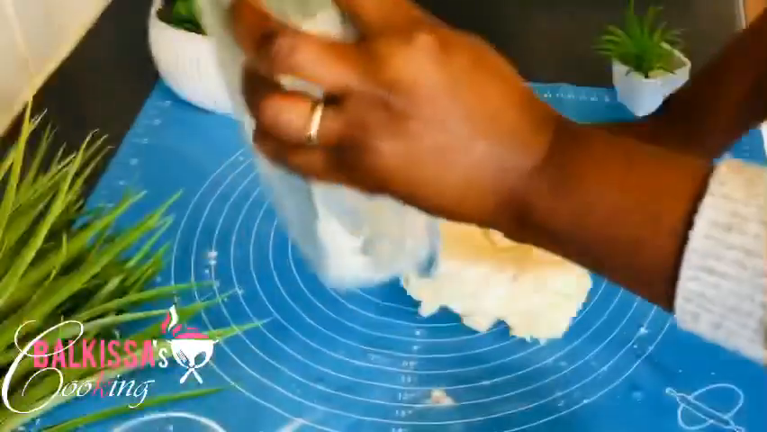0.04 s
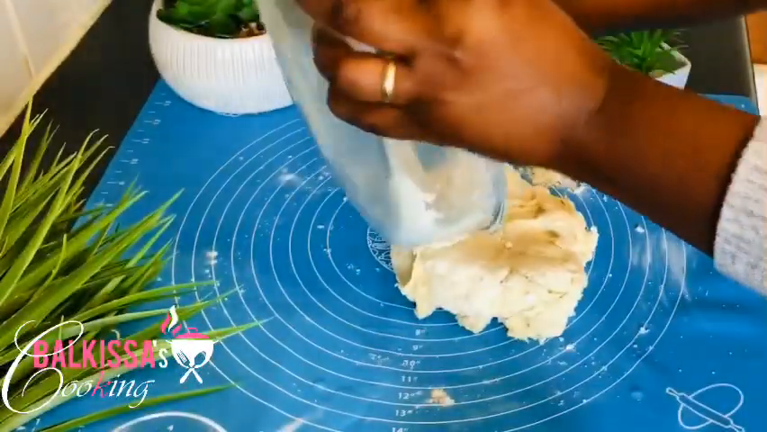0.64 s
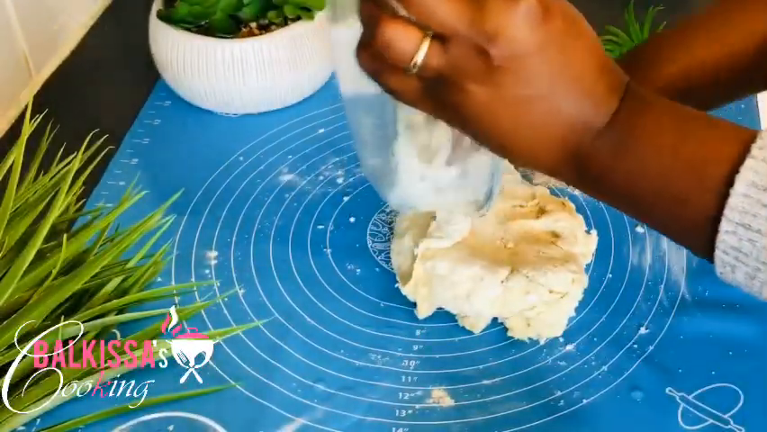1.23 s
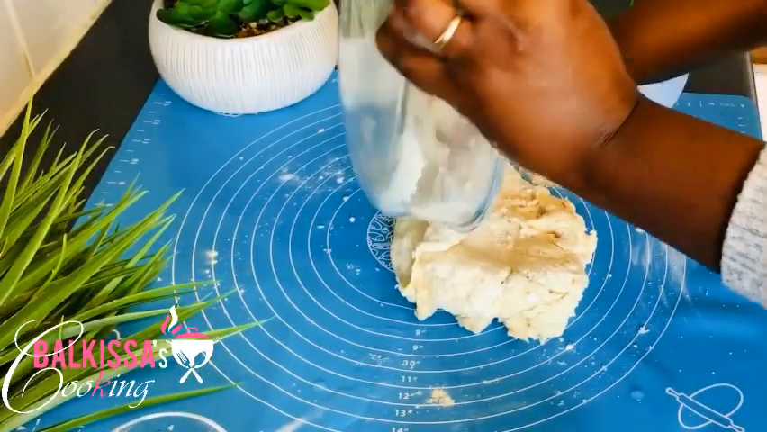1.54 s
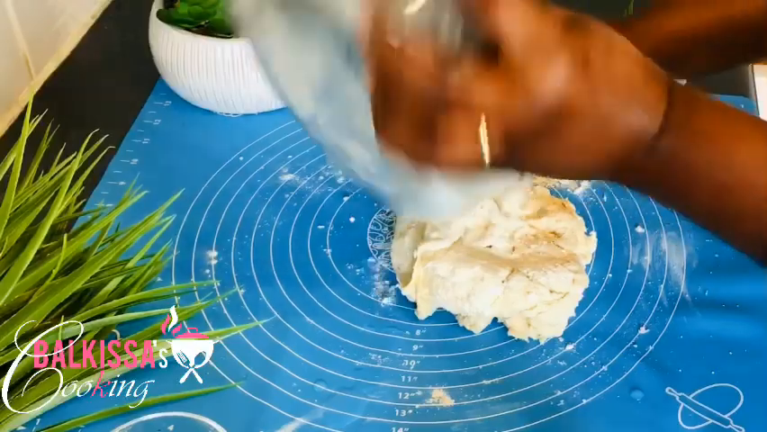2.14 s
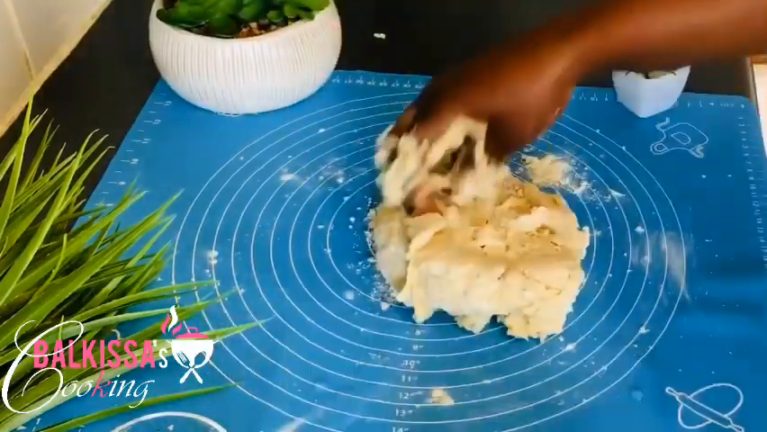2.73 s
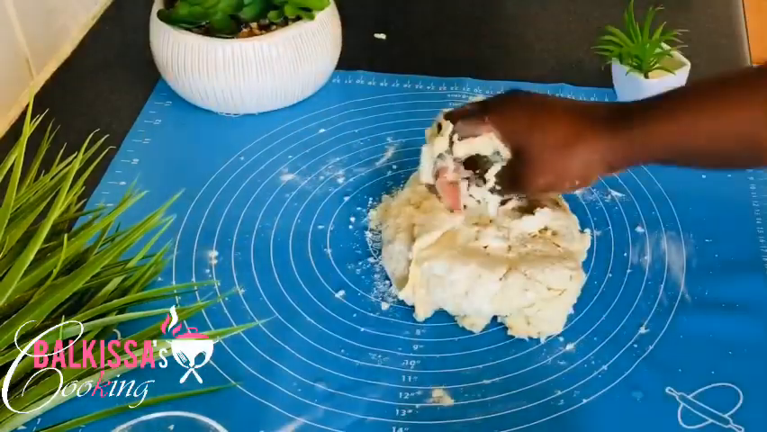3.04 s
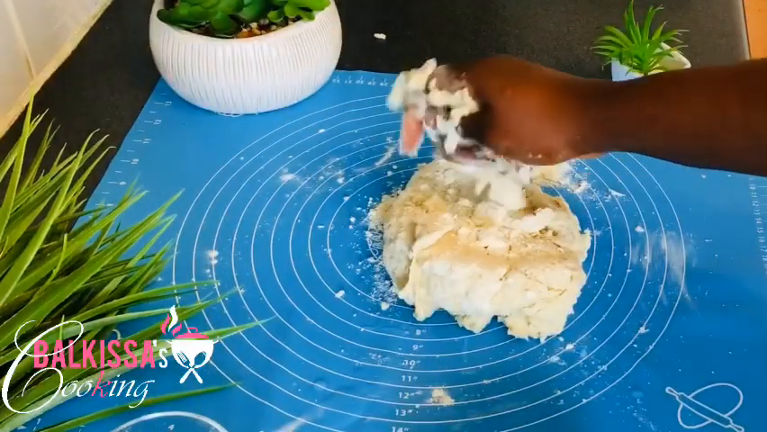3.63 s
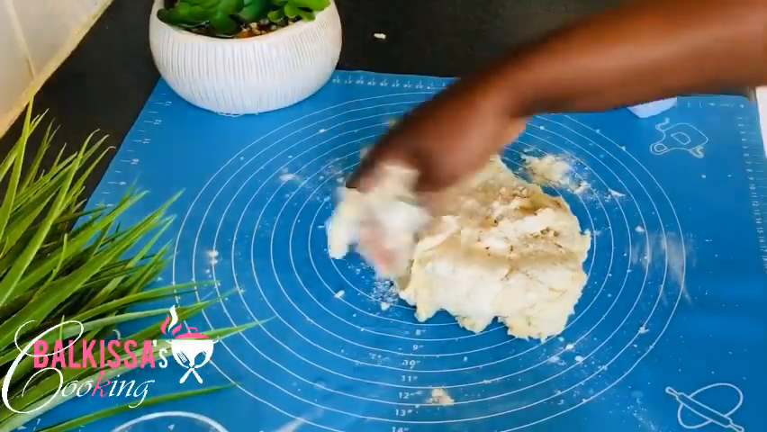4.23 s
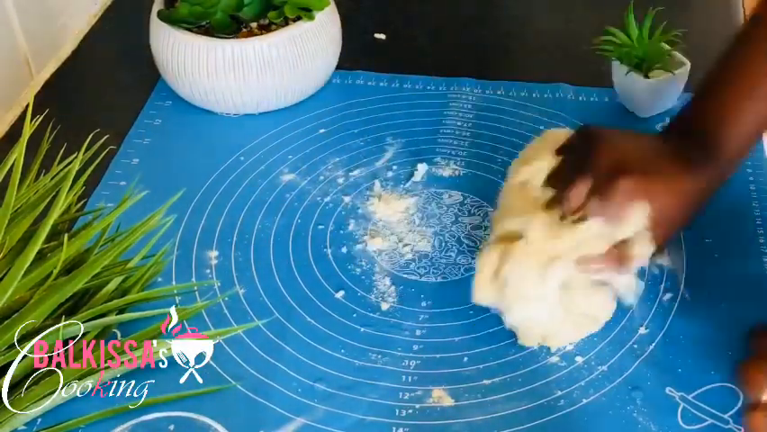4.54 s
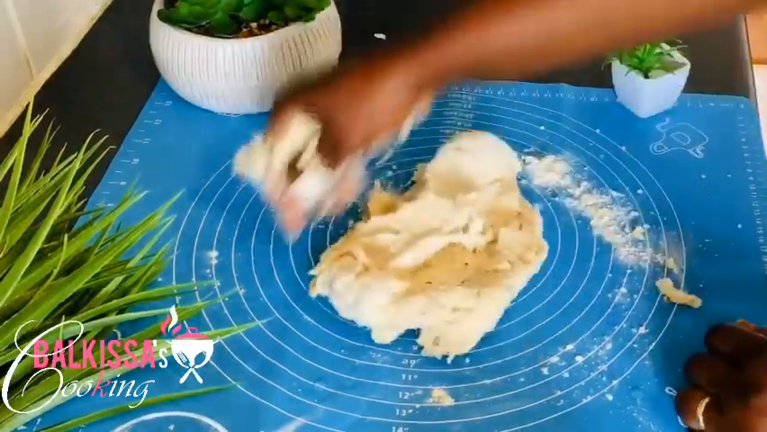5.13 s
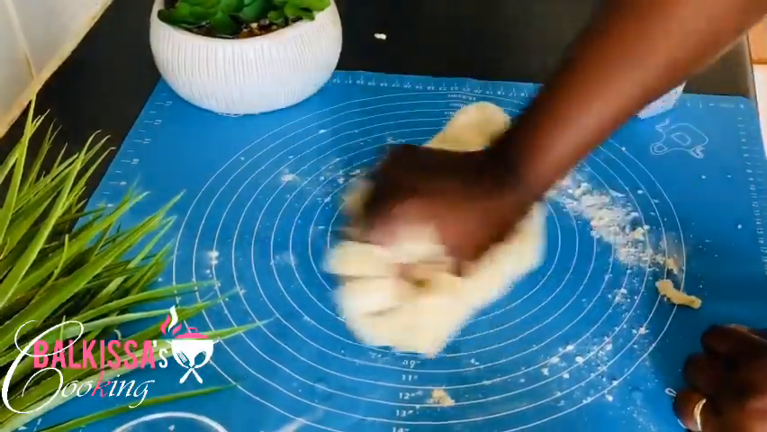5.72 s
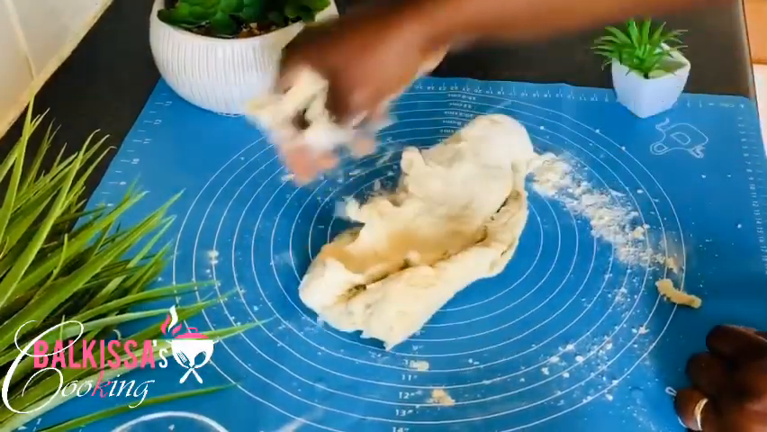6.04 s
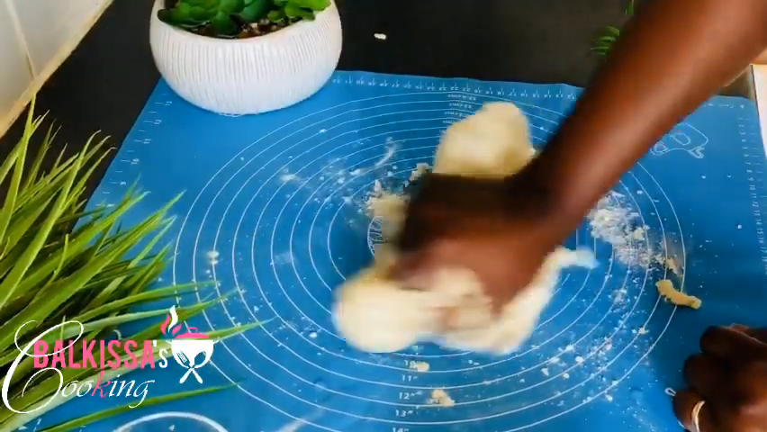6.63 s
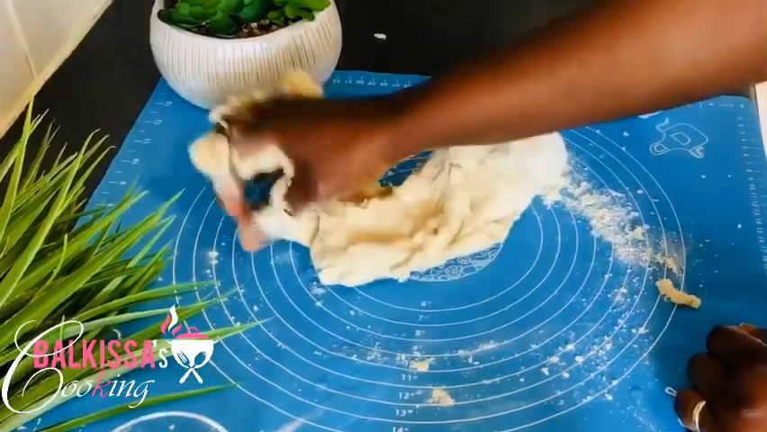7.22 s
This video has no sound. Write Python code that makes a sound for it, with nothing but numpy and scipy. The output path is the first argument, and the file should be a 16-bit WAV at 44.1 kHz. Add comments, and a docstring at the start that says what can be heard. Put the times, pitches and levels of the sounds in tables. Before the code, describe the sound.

Fingers softly wipe and tap the inside of a glass bowl, with faint clinks and a small plop of dough. About halfway through, the bowl is set on the counter in two loud, rattling knocks that ring briefly. Then dough slides over a floury mat and is slapped down about once a second, with soft thumps, wet smacks and little squishes of air. The microphone is close, in a small, quiet kitchen.

```python
"""Kneading dough at a kitchen counter

Close to the microphone in a small, hard room with a low hush, fingers wipe out and tap the wall of a
hand-held glass bowl. It is put down to one side in two rattling knocks that ring it and thud in the
counter. Then dough is pushed across a floury silicone mat, folded and slapped back about once a second:
the skin smacks, the lump thumps and trapped air squishes out."""
import sys
import numpy as np
from scipy import signal
from scipy.fft import rfft, irfft
from scipy.io import wavfile
from scipy.ndimage import uniform_filter1d

SR = 44100
rng = np.random.default_rng(int(sys.argv[2]) if len(sys.argv) > 2 else 0)


def master_out(mix):
    """Clip the mix to full scale and print it as 16-bit PCM to the path in sys.argv[1]."""
    frames = np.transpose(np.atleast_2d(mix))
    ceiling = np.clip(frames, -1, 1)
    pcm = np.round(ceiling * 32767).astype(np.int16)
    wavfile.write(sys.argv[1], SR, pcm)


N = 321048
TIME = np.arange(N) / SR
RING = TIME[:SR * 3 // 4]  # time axis of one short sound

# The room's reverberation. Each row: frequency in Hz, t60 in seconds.
ROOM_DECAY = [(100, .45), (700, 0.38), (3000, 0.36), (8000, 0.37), (15000, 0.091)]
# Noise spectra. Each row: frequency in Hz, level per Hz in dB.
HUSH_COLOUR = [(15, -35.5), (25, -8.5), (96, 1.5), (269, -8.5), (513, -2.5), (881, -3.5), (1180, -10),
               (2520, -18.5), (2730, -20), (4330, -21), (8490, -27), (14600, -27.5), (15800, -27)]  # the quiet room
WIPE_COLOUR = [(300, -29), (1500, 2), (3000, 8), (6000, 6.5), (10000, 0.5), (15500, 1)]  # fingers on glass
THUD_COLOUR = [(35, -28.5), (70, -6.5), (100, 4.5), (135, -1), (190, -1.5), (260, 1.5), (380, 1),
               (450, -15.5), (1200, -38)]  # the counter, struck
BODY_COLOUR = [(300, -38.5), (500, -14.5), (660, 0.5), (850, -6.5), (1200, -7.5), (1550, -19),
               (2500, -57.5)]  # the bowl's body
CLACK_COLOUR = [(400, -28), (1000, -6.5), (2100, 6), (3300, -2.5), (5000, -6.5), (8000, -15), (12000, -29),
                (16000, -31)]  # its hard contact
DRAG_COLOUR = [(130, -20), (340, 1.5), (1500, -33.5)]  # its foot rubbing
PRESS_COLOUR = [(25, -27.5), (60, -1), (110, -7.5), (165, -0.5), (240, -12), (360, -20.5), (560, -15),
                (2000, -34.5)]  # the counter under load
SLIDE_COLOUR = [(300, -3.5), (1400, 0.5), (2200, 3.5), (5000, 2.5), (7500, 0), (10000, -2), (15500, -10.5)]  # floury dough sliding
SMACK_COLOUR = [(300, 9), (1200, 3.5), (2000, -7), (3000, 0.5), (4200, -4.5), (7000, -9.5), (15000, -44.5)]  # wet smacks and small ticks

# Resonances of the hand-held bowl's wall, its rim and the soft lump on the counter.
# Each row: frequency in Hz, level in dB, t60 in seconds.
WALL_MODES = [(1324, 2, 0.12), (1590, -16, .1), (2183, 6.5, 0.085), (2568, 5.5, 0.069), (2750, -7, 0.1),
              (3480, 6, 0.076), (4400, -9.5, 0.088), (5130, -13, 0.13)]
RIM_MODES = [(642, -2.5, 0.17), (715, -10, 0.15), (1350, -10, 0.15), (1590, -2.5, 0.084), (2793, 0.5, 0.11),
             (4280, -5, 0.1), (6352, -13, 0.047), (7480, -12, .09)]
LUMP_MODES = [(57, -4, 0.25), (166.4, 0.5, 0.11), (201, 1.5, 0.063), (266, -3.5, 0.038),
              (395.5, -8.5, 0.12), (479, -3.5, 0.066), (589, 3.5, 0.048)]
# The bowl's resonances on the counter. Each row: frequency in Hz, level in dB landing on its edge,
# level in dB landing on its base, t60 in seconds.
BOWL_MODES = [(260.3, -23, -9, .22), (285, -9, -21, 0.39), (620, -9, -10, .22), (641, -9, 1, .25),
              (704, -13.5, -2, .27), (751, 2, -15, .38), (750, -6.5, -9, .24), (822, 1, -4, .26),
              (849.2, 4, 7.5, 0.14), (930, -7.5, -7, 0.24), (933, -9, -1.5, 0.16), (1067, -9, -8, 0.32),
              (1125, -3.5, -10, 0.24), (1220, -5.5, -19, .26), (1340, -9.5, -23.5, 0.34),
              (1423, -20, -23.5, 0.17), (1900, -26, -18.5, 0.28), (3440, -24, -18, 0.23),
              (3670, -26, -24.5, 0.36), (4526, -34, -25.5, 0.29), (5200, -22, -26.5, 0.26),
              (5940, -39, -19, 0.23), (6520, -25.5, -24.5, .21)]

# Light taps on the bowl's wall, and on its rim as it is carried past.
# Each row: start in seconds, ring in dB, tick in dB.
WALL_TAPS = [(0.278, -43, -52.5), (0.585, -62, -58), (0.6825, -68, -56), (0.8337, -50.5, -57.5),
             (1.2278, -55, -54.5), (1.702, -56, -67), (2.4112, -63, -56.5)]
RIM_TAPS = [(2.2608, -56, -63), (2.4997, -50, -48)]
# Rubbing and leaning. Each row: start in seconds, end in seconds, level in dB.
BOWL_WIPES = [(0, .13, -73), (0.751, 1.105, -57.5), (1.266, 1.46, -60), (1.632, 1.852, -61)]  # fingers along the glass
BOWL_GRIP = (.55, 3, -75)  # one row: the hand holding the bowl as it is emptied
BOWL_LEANS = [(0, .11, -56.5), (.35, .62, -70.5)]  # the bowl leans on the lump and rumbles the counter
BOWL_DRAG = (3.55, 3.8, -53.5)  # one row: the bowl's foot on the counter
# Fingers rub dough off each other. Each row: start and end in seconds, dull rub in dB, dry hiss in dB.
FINGER_RUBS = [(2.585, 2.745, -76, -76), (2.778, 2.89, -71, -65.5), (2.883, 3.192, -65.5, -72.5),
               (3.587, 3.76, -76, -74)]
# The bowl meets the counter, one side and then the other.
# Each row: start in seconds, ring in dB, thud in dB, clack in dB, loss per rebound in dB.
BOWL_BLOWS = [(3.3828, -16, -27.5, -30.5, 11), (3.4405, -21.5, -39, -38.5, 3), (3.7944, -16, -31.5, -25, 6),
              (3.8235, -10, -28.5, -25.5, 11), (3.8394, -10.5, -24.5, -29.5, 10.5)]
# The hand shoves the lump over the mat. Each row: start and end in seconds, slide in dB, moment of
# bearing down in seconds, press in dB.
PUSHES = [(4.385, 4.816, -66, 4.675, -45), (5.594, 5.788, -63, 5.625, -68),
          (6.512, 6.794, -58.5, 6.635, -53)]
# Larger air pockets burst in the folds. Each row: start in seconds, level in dB, length in seconds,
# centre in Hz.
SQUISHES = [(4.231, -54, 0.017, 3220), (4.272, -58, 0.045, 2100), (4.58, -57.5, 0.033, 2320),
            (5.56, -54.5, 0.044, 4600), (5.814, -55, 0.029, 1820), (6.285, -48, 0.0082, 3680)]
# Dough lands and is folded. Each row: start in seconds, thump in dB, smack in dB, gain of the lowest
# mode in dB, air pop in dB, fold in dB.
SLAPS = [(0.598, -47, -57, -2, -72, -78), (4.128, -46, -66, -9, -60, -58.5),
         (5.126, -33, -49, -9.5, -44, -50.5), (6.1076, -30, -60, -9, -44.5, -53.5),
         (7.0396, -29.5, -34, -11, -54, -67), (7.2236, -29.5, -50, -4.5, -43.5, -61)]

SEATED_S = 3.7  # from here on the bowl lands on its base and the hand is on the dough


def amp(db):
    """Decibels to gain."""
    return 10 ** (np.asarray(db) / 20)


def unit(x):
    """Scales to rms 1."""
    return x / np.sqrt(np.mean(x ** 2) + 1e-20)


def read(points, hz):
    """Reads a table on a log-frequency axis."""
    f, value = np.transpose(points)
    return np.interp(np.log(hz + 1), np.log(f + 1), value)


def fade(t60):
    """Dies by 60 dB in t60 seconds."""
    return np.exp(-np.log(1000) * RING / t60)


def add(mix, s, sound):
    """Lays a sound into the mix at time s."""
    part = mix[max(round(s * SR), 0):][:len(sound)]
    part += sound[:len(part)]


def colour(x, spectrum):
    """Gives x a spectrum, at rms 1."""
    gain = amp(read(spectrum, np.fft.rfftfreq(len(x), 1 / SR)))
    return unit(irfft(rfft(x) * gain, len(x)))


def burst(spectrum, t60, rise):
    """Countless short-lived modes: coloured noise that swells and dies."""
    return colour(rng.standard_normal(len(RING)), spectrum) * fade(t60) * (1 - np.exp(-RING / rise))


def ring(modes, scatter_db, detune, rise):
    """Damped modes; each contact gives them another sign and weight, and its load shifts them a little."""
    hz, db, t60 = np.transpose(modes)[:, :, None]
    side, weight, shift = rng.uniform(-0.82, 1, (3,) + hz.shape)
    gain = np.sign(side) * amp(db + scatter_db * weight)
    waves = gain * fade(t60) * np.sin(2 * np.pi * hz * (1 + detune * shift) * RING)
    return waves.sum(0) * (1 - np.exp(-RING / rise)) / np.sqrt(np.sum(amp(db) ** 2) / 2)


def grains(size, per_s, spread_db):
    """Tiny sticky contacts let go at random, a few of them large."""
    strength = amp(spread_db * np.minimum(rng.exponential(1, size), 4))
    return unit(rng.standard_normal(size) * strength * (rng.random(size) < per_s / SR))


def crackle(per_s, spread_db, t60):
    """Sparse contacts let go, each with a short tick."""
    releases = grains(N, per_s, spread_db)
    return unit(signal.oaconvolve(releases, burst(SMACK_COLOUR, t60, rise=.0003))[:N])


def sticking(slip_s=.0249, depth_db=1.5):
    """Uneven gain of a surface that sticks and slips."""
    window = np.hanning(round(2 * slip_s * SR))
    wander = unit(signal.oaconvolve(rng.standard_normal(N), window, "same"))
    return unit(amp(depth_db * wander))


def strokes(rows, edge):
    """A hand stroke gathers speed, holds it and slows; friction noise follows the speed."""
    power = np.zeros(N)
    for start, end, db in rows:
        ramp = np.clip(np.minimum(TIME - start, end - TIME) / edge + .5, 0, 1)
        power += amp(db) ** 2 * ramp ** 4
    return np.sqrt(power)


def room_hush():
    """The steady low hush of the kitchen at the microphone."""
    return amp(-64.5) * colour(rng.standard_normal(N), HUSH_COLOUR)


def reflections(x):
    """Nearby hard walls return sparse echoes of random sign; the treble dies first."""
    taps = rng.choice([-1., 1.], len(RING)) * (rng.random(len(RING)) < 3000 / SR) * (RING > .005)
    hz, t, spectrum = signal.stft(taps, SR, nperseg=256)
    decay = np.exp(-np.log(1000) * t / read(ROOM_DECAY, hz)[:, None])
    tail = signal.istft(spectrum * decay, SR, nperseg=256)[1]
    return signal.fftconvolve(x, tail / np.linalg.norm(tail))[:N]


def floury_hiss():
    """Dense, uneven friction of a floury surface."""
    return colour(grains(N, per_s=45000, spread_db=1), SLIDE_COLOUR) * sticking()


def fingers(skin_hz=3300):
    """Doughy fingers rub together: a dull rub where they are wet, a hiss where they are floury."""
    lowpass = signal.butter(2, skin_hz, fs=SR, output="sos")
    dull = unit(signal.sosfilt(lowpass, rng.standard_normal(N))) * sticking()
    wet = strokes([(start, end, db) for start, end, db, _ in FINGER_RUBS], edge=0.096)
    dry = strokes([(start, end, db) for start, end, _, db in FINGER_RUBS], edge=0.095)
    return wet * dull + dry * floury_hiss()


def bowl_wipes():
    """Each finger stroke excites the bowl's wall at another place; the shifting grip ticks on the glass."""
    out = np.zeros(N)
    for wipe in BOWL_WIPES + [BOWL_GRIP]:
        slips = strokes([wipe], edge=0.086) * grains(N, per_s=4600, spread_db=3.3) * sticking()
        tone = ring(WALL_MODES, scatter_db=3, detune=.01, rise=.0003)
        wall = unit(burst(WIPE_COLOUR, t60=0.017, rise=.0001)) + amp(-6.5) * unit(tone)
        out += signal.oaconvolve(slips, wall / np.linalg.norm(wall))[:N]
    grip = strokes([(*BOWL_GRIP[:2], -76)], edge=.1)
    return out + grip * crackle(per_s=14, spread_db=3, t60=.03)


def clinks(grip_t60=.43):
    """Light taps tick and ring on the bowl's wall, damped by the hand that holds it, and on its rim."""
    out = np.zeros(N)
    for s, ring_db, tick_db in WALL_TAPS:
        for delay, db in ((0, 0), (.012, -1.5)):  # the contact touches the glass twice
            clink = ring(WALL_MODES, scatter_db=1, detune=.004, rise=.002)
            add(out, s + delay, amp(ring_db + db) * clink * fade(grip_t60))
        add(out, s, amp(tick_db) * burst(SMACK_COLOUR, t60=0.096, rise=0.00023))
    for s, ring_db, tick_db in RIM_TAPS:
        add(out, s, amp(ring_db) * ring(RIM_MODES, scatter_db=1, detune=0, rise=.0005))
        add(out, s, amp(tick_db) * burst(WIPE_COLOUR, t60=0.056, rise=0.00043))
    return out


def rocking(s, loss_db, gap_s=.026, shrink=.9):
    """One landing as contacts (s, dB): a graze, the blow, then two ever quicker, weaker rebounds."""
    return [(s - .007, -23), (s, 0), (s + gap_s, -loss_db), (s + gap_s + gap_s * shrink, -2 * loss_db)]


def bowl_knocks():
    """Each blow rings the bowl, clacks and thuds in the counter; between the knocks its foot drags."""
    out = strokes([BOWL_DRAG], edge=.05) * colour(rng.standard_normal(N), DRAG_COLOUR)
    for landing, ring_db, thud_db, clack_db, loss_db in BOWL_BLOWS:
        modes = [(hz, edge if landing < SEATED_S else base, t60) for hz, edge, base, t60 in BOWL_MODES]
        for s, db in rocking(landing, loss_db):
            add(out, s, amp(ring_db + db - 7) * ring(modes, scatter_db=2, detune=.007, rise=0.0015))
            add(out, s, amp(ring_db + db + 1) * burst(BODY_COLOUR, t60=0.085, rise=.002))
            add(out, s + .004, amp(thud_db + db) * burst(THUD_COLOUR, t60=0.15, rise=0.0043))
            clack = burst(CLACK_COLOUR, t60=0.048, rise=.0006)
            haze = amp(-9) * burst(CLACK_COLOUR, t60=0.24, rise=0.0059)  # dense upper modes linger
            add(out, s, amp(clack_db + 1.5 * db) * (clack + haze))  # softer contacts are duller
    return out


def around(s, length, db):
    """A stroke (start s, end s, dB) centred on time s."""
    return s - length / 2, s + length / 2, db


def bearing(s, db, half_s=.032):
    """The hand's weight comes down and eases off around time s."""
    return amp(db) / (1 + ((TIME - s) / half_s) ** 2) ** 1.2


def hand(lift_s=.12):
    """The hand pushes, bears down, pulls back, lifts and gathers; gives speed, force and mat contact."""
    moves, force = [], np.zeros(N)
    contact = 1. * (TIME > SEATED_S)
    for start, end, slide_db, s, press_db in PUSHES:
        pull_back = around(s + .22, length=.14, db=-62.5)
        moves += [(start, end, slide_db), pull_back]
        force += bearing(s, press_db)
    for s, *_, fold_db in SLAPS:
        moves.append(around(s + .16, length=.11, db=fold_db - 12))  # fingers gather the lump
        contact *= (TIME < s - lift_s) | (TIME > s)  # clear of the mat before the slap
    for s, db, length, _ in SQUISHES:
        force += bearing(s + length, db - 4.5)  # the squeeze that bursts a pocket
    return strokes(moves, edge=0.097), force, uniform_filter1d(contact, size=SR // 25)


def spurt(length, hz):
    """A short fizz of air leaving a pocket in the dough, at the pocket's own resonance."""
    hump = [(hz / 4, -22), (hz / 1.84, -13), (hz, 0), (hz * 1.53, -8), (hz * 4, -25)]
    fizz = colour(grains(len(RING), per_s=7000, spread_db=3), hump)
    age = RING / (length / 2)
    return fizz * (age * np.exp(1 - age)) ** 2


def pockets(speed, count=46, scatter_octaves=.64):
    """Small air pockets burst at random while the dough is worked, louder the faster it moves."""
    out = np.zeros(N)
    times = rng.uniform(SEATED_S, TIME[-1], count)
    scatter = np.clip(rng.standard_normal((count, 2)), -2, 2)
    for s, (size_db, pitch) in zip(times, scatter):
        gain = np.interp(s, TIME, speed) * amp(size_db - 1)
        add(out, s, gain * spurt(length=.008, hz=3100 * 2 ** (scatter_octaves * pitch)))
    return out


def flour_puffs(decay_s=.014):
    """Each slap blows flour across the mat; gives the gain of its fizz."""
    out = np.zeros(N)
    for s, _, smack_db, *_ in SLAPS:
        add(out, s, amp(smack_db - 15.5) * np.exp(-RING / decay_s))
    return out


def kneading(flour_hz=11000):
    """Dough hisses over the mat and sticky threads snap; hand and leaning bowl rumble the counter."""
    speed, force, contact = hand()
    # the contact terms are small movements of the lump resting under the hand
    friction = np.sqrt(speed ** 2 + (amp(-11) * force) ** 2 + (amp(-77) * contact) ** 2)
    load = np.sqrt(force ** 2 + (amp(-3) * speed) ** 2 + (amp(-70) * contact) ** 2)
    highpass = signal.butter(2, flour_hz, "high", fs=SR, output="sos")
    flour = unit(signal.sosfilt(highpass, grains(N, per_s=20000, spread_db=2.5)))
    threads = crackle(per_s=100, spread_db=4, t60=.01208)
    slide = friction * (amp(0.4) * floury_hiss() + amp(-5.5) * flour + amp(-2.5) * threads)
    rumble = (load + strokes(BOWL_LEANS, edge=0.024)) * colour(rng.standard_normal(N), PRESS_COLOUR)
    return slide + flour_puffs() * flour + pockets(speed) + rumble


def squishes(squelch_s=.06):
    """Air leaves the dough at every slap, fold and press, and now and then from a larger pocket."""
    out = np.zeros(N)
    for s, *_, pop_db, fold_db in SLAPS:
        add(out, s - .002, amp(pop_db) * spurt(length=.0065, hz=3000))  # trapped under the lump
        add(out, s + .051, amp(fold_db) * spurt(length=.038, hz=3200))
    for *_, s, press_db in PUSHES:
        add(out, s - squelch_s / 2, amp(press_db - 3.5) * spurt(squelch_s, hz=2920))
    for s, db, length, hz in SQUISHES:
        add(out, s, amp(db) * spurt(length, hz))
    return out


def slaps():
    """The wet skin smacks first; the mass of the lump thumps just after and shakes the counter."""
    out = np.zeros(N)
    for s, thump_db, smack_db, weight_db, *_ in SLAPS:
        modes = [(hz, db + weight_db * (k == 0), t60) for k, (hz, db, t60) in enumerate(LUMP_MODES)]
        wobble = ring(modes, scatter_db=1, detune=.02, rise=.005)
        thump = wobble + amp(-7.5) * burst(THUD_COLOUR, t60=0.12, rise=0.0046)
        add(out, s + 0.0027, amp(thump_db) * thump)
        add(out, s, amp(smack_db) * burst(SMACK_COLOUR, t60=0.051, rise=0.0005))
    return out


def scene():
    """Bowl and dough at one counter, close to a mono microphone, with the small room behind."""
    knocks = bowl_knocks()
    glass = bowl_wipes() + clinks()
    dough = fingers() + kneading() + squishes() + slaps()
    room = reflections(amp(-8.5) * knocks + amp(-10.5) * glass + amp(-8.5) * dough)
    return (room_hush() + room + glass + amp(-0.5) * knocks + dough)[None]


def record(dry):
    """The small microphone loses the bass below 36 Hz; the recorder passes nothing much above 15.9 kHz."""
    low_cut = signal.butter(2, 36, "high", fs=SR, output="sos")
    band_limit = signal.firwin(511, 15900, window=("kaiser", 9), fs=SR)
    return signal.oaconvolve(signal.sosfilt(low_cut, dry), band_limit[None], "same")


dry = scene()
out = record(dry)
master_out(out)
```